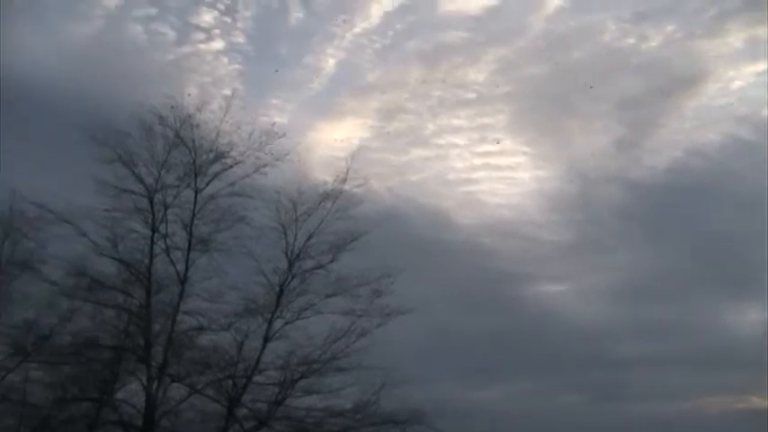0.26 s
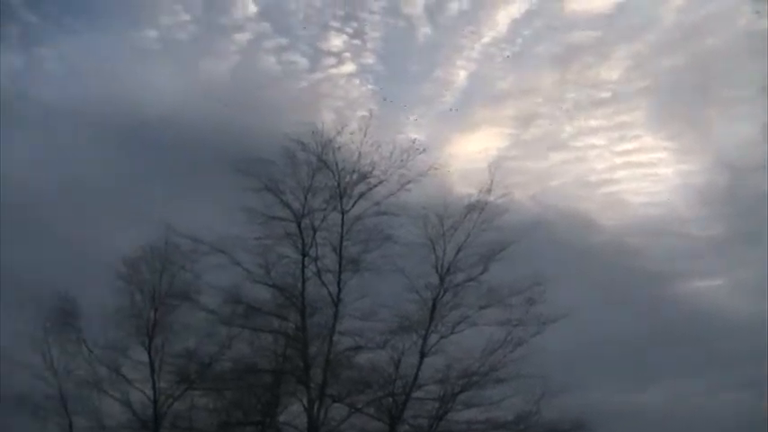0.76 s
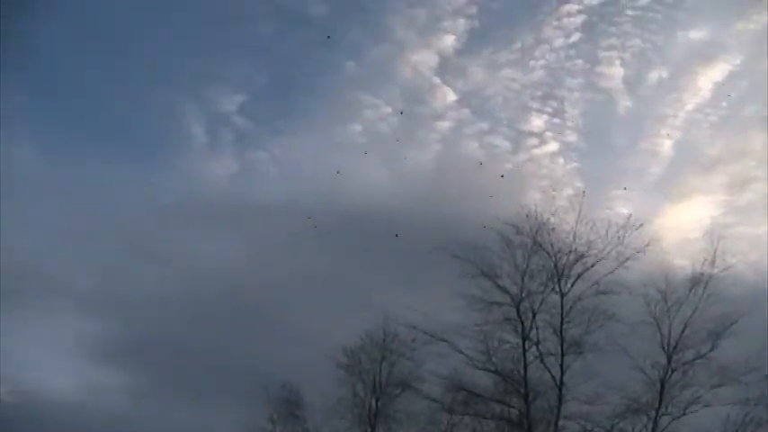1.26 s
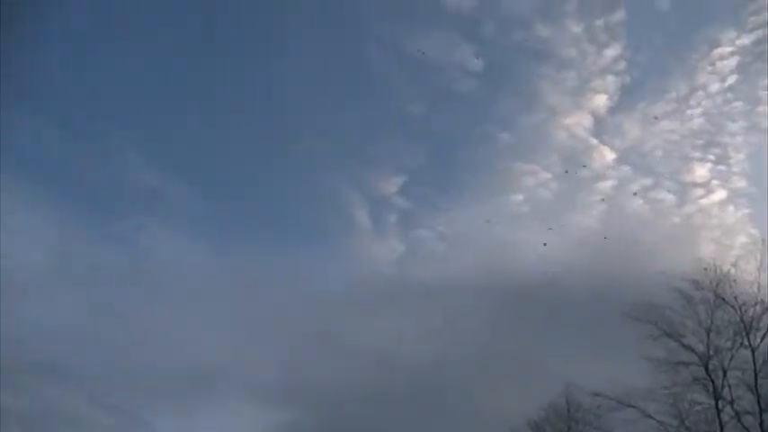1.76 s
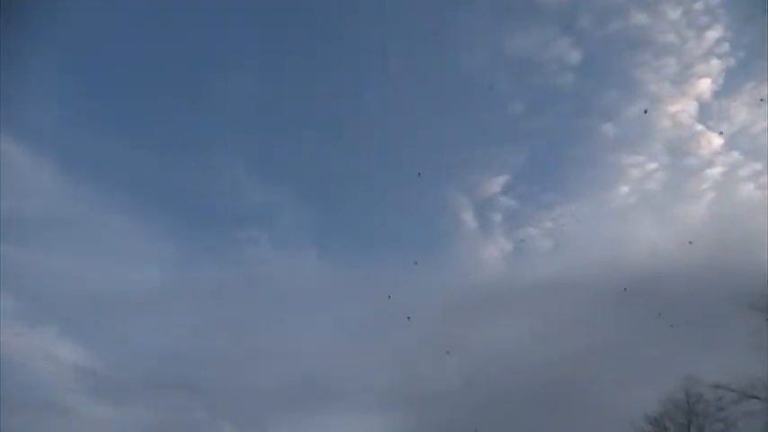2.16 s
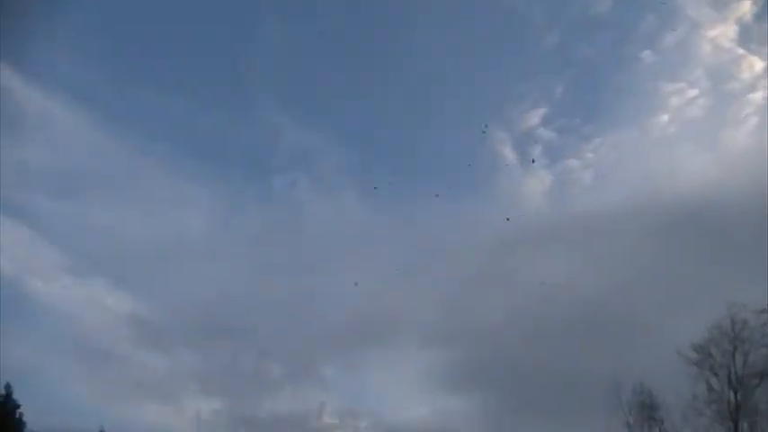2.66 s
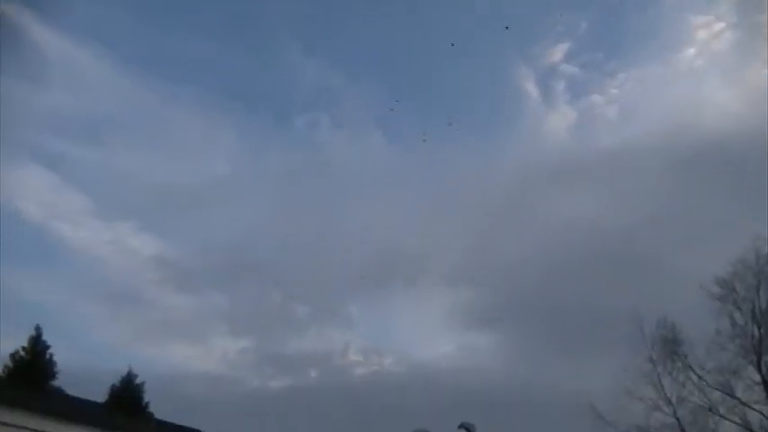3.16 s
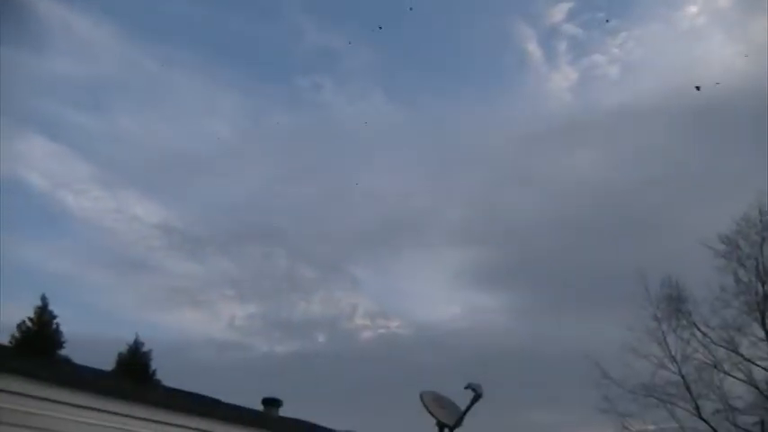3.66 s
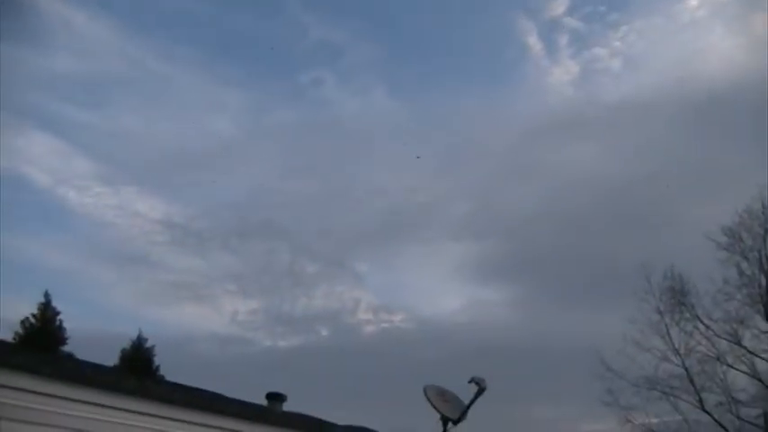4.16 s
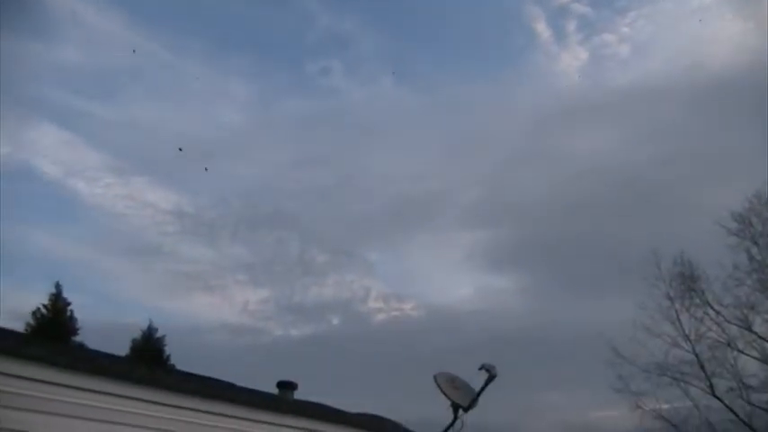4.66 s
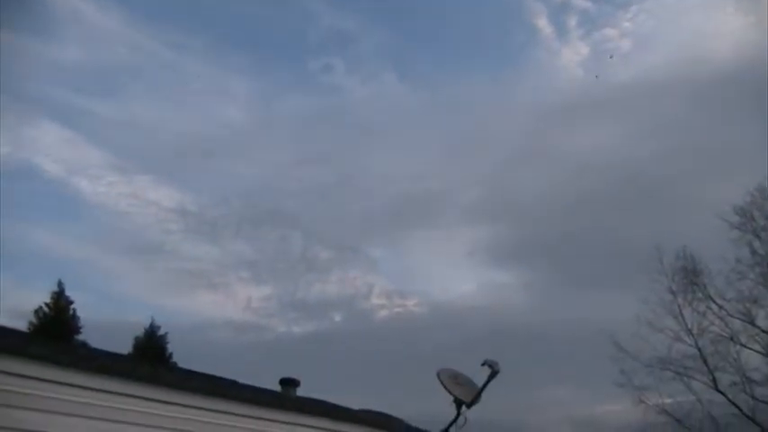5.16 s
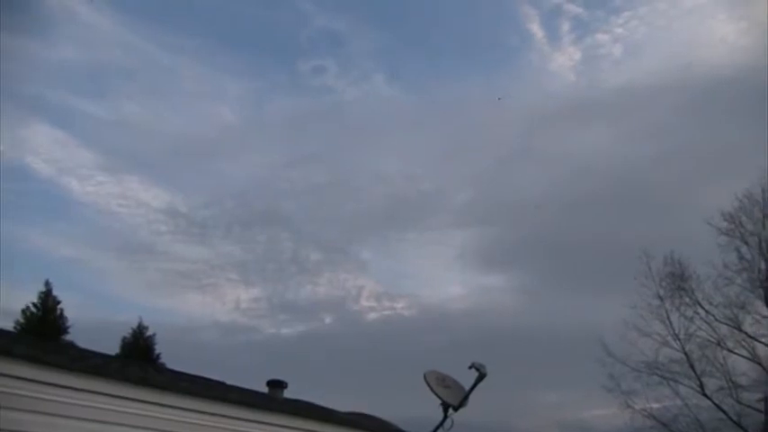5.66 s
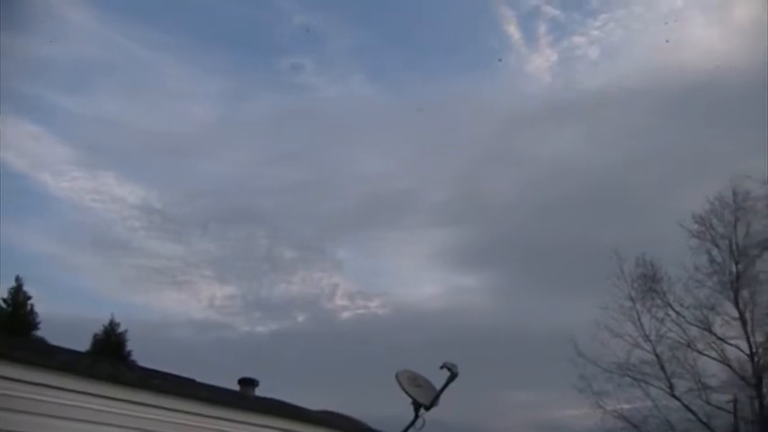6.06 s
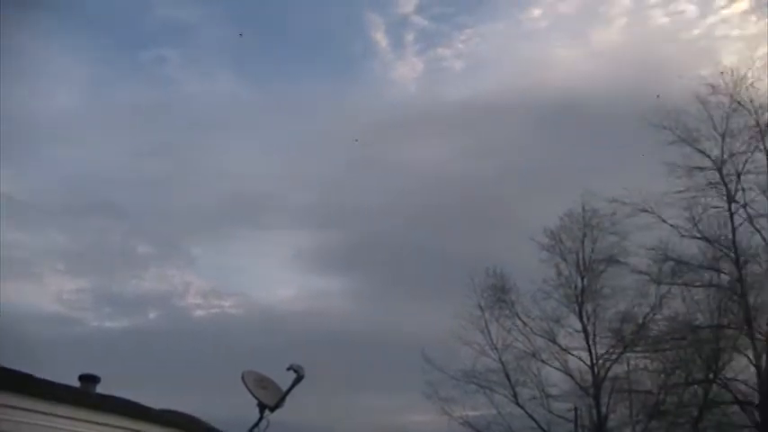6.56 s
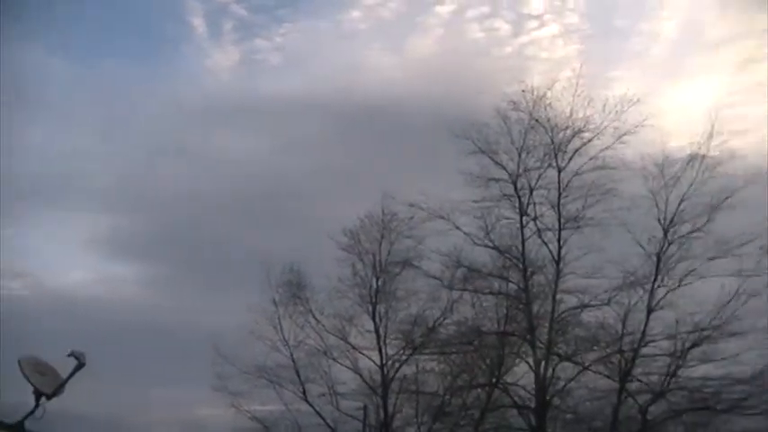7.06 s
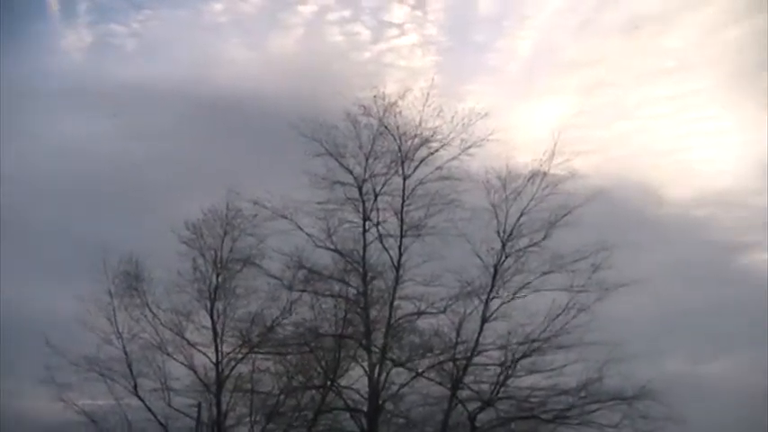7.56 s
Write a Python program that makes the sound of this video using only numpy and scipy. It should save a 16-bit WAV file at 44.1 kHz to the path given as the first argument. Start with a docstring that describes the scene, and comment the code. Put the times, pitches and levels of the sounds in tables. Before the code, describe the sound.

A steady, wide mass of high bird chatter surrounds an exposed outdoor microphone, softly echoed by trees and roofs. Clear near whistles open it, then thin out among dry rasping calls; a faint low drone passes early. Blunt wind buffets hit mid-way, leaning left. Later the close whistles crowd together again, and two distant pure hoots end it.

```python
"""A large flock of small birds passes over a garden. From the start, gliding sines whistle close by, far ones
crowd between 3 and 5 kHz over a smooth hiss of shaped noise, and low, lumpy noise is wind on the microphone ports.
Harsh chacks, noise bursts with a colour of their own, join within moments; a faint drone of narrow noise follows.
Hard buffets, short bursts of a low sine, hit the ports from 1.3 s and hardest at 3.4 and 4.5 s.
Past 7 s a far, pure low tone hoots twice."""
import sys
import numpy as np
from scipy import signal
from scipy.fft import rfft, irfft, next_fast_len
from scipy.io import wavfile
from scipy.ndimage import map_coordinates

SR = 44100
rng = np.random.default_rng(int(sys.argv[2]) if len(sys.argv) > 2 else 0)


def master_out(mix):
    """Clip the mix to full scale and print it as 16-bit PCM to the path in sys.argv[1]."""
    frames = np.transpose(np.atleast_2d(mix))
    ceiling = np.clip(frames, -1, 1)
    pcm = np.round(ceiling * 32767).astype(np.int16)
    wavfile.write(sys.argv[1], SR, pcm)


N = 343977


def from_db(db):
    """Gain of a level in dB."""
    return 10 ** (np.asarray(db) / 20)


def rms_one(x):
    """Scaled to rms 1."""
    return x / np.sqrt(np.mean(x ** 2) + 1e-20)


def in_time(rows):
    """Each column of a timed curve, sample by sample."""
    s, *columns = np.transpose(rows)
    return [np.interp(np.arange(N) / SR, s, c) for c in columns]


def at_hz(points, hz):
    """A spectrum read on a log-frequency axis."""
    points = np.array(points)
    return np.interp(np.log(hz), np.log(points[:, 0]), points[:, 1])


def sides(pan_db):
    """Left and right gain of a left-right difference; positive leans left."""
    return from_db(np.array([pan_db / 2, -pan_db / 2]))


def drift(rate_hz):
    """Slow noise of spread 1: white noise through two equal low-pass poles at rate_hz."""
    step = 40   # samples between slow values
    pole = np.exp(-2 * np.pi * rate_hz * step / SR)
    white = rng.standard_normal(N // step + 2002)
    slow = signal.lfilter([1], [1, -2 * pole, pole * pole], white)[2000:]
    return np.interp(np.arange(N) / step, np.arange(len(slow)), rms_one(slow))


def shaped(spectrum):
    """Two unrelated noises of one spectrum, as Fourier coefficients, and their frequencies."""
    size = next_fast_len(N)
    hz = np.maximum(np.arange(size // 2 + 1) * SR / size, 1)
    return rfft(rng.standard_normal((2, size))) * from_db(at_hz(spectrum, hz)), hz


# how alike the two ports hear a noise: f/Hz, likeness (1 the same, 0 unrelated, -1 opposed)
PORT_LIKENESS = [(300, -0.47), (950, 0.087), (2000, 0.64), (6000, 0.16), (15000, 0.066)]


def coloured(spectrum):
    """Stereo noise of a spectrum, the two sides as alike as the ports make them; rms 1."""
    (mid, side), hz = shaped(spectrum)
    alike = np.clip(at_hz(PORT_LIKENESS, hz), -1, 1)
    pair = np.sqrt(1 + alike) * mid + np.sqrt(1 - alike) * side * [[1], [-1]]
    return rms_one(irfft(pair, next_fast_len(N))[:, :N])


def add(out, s, sound):
    """Mixes a sound in at s seconds."""
    at = max(round(s * SR), 0)
    out[..., at:at + sound.shape[-1]] += sound[..., :max(N - at, 0)]


def notes(rows, edge_s):
    """Gain of notes that swell, hold and fade with soft edges."""
    t = np.arange(N) / SR
    gain = np.zeros(N)
    for s, length, db in rows:
        ramp = np.clip(np.minimum(t - s, s + length - t) / edge_s, 0, 1)
        gain += from_db(db) * np.sin(np.pi / 2 * ramp) ** 2
    return gain


# colour of the blurred flock, which also weights the far whistles: f/Hz, relative level/dB per Hz
WASH_SPECTRUM = [(180, -37), (300, -6.5), (621, -9), (1760, -7), (2990, -2), (3890, -3), (4910, -7.5),
                 (5880, -9), (7920, -17), (9660, -25), (12000, -27), (15600, -37)]


def wash(flock_db):
    """The farthest birds and the town blur into a smooth hiss, shaped noise of unsteady level."""
    return from_db(flock_db - 4.5 + 1.13 * drift(10.3)) * coloured(WASH_SPECTRUM)


# levels of the second and third partial of a near whistle, before pitch and strain: level/dB
OVERTONE_LEVELS = [-25, -29]
# last pitches of the calls that hook: lower and upper f/Hz
HOOK_RANGE = [4500, 5500]
GLIDE_SETTLES, HOOK_SETTLES = 1.106, 4.2   # e-folds of glide speed over one whistle; hooked calls slow sooner
CHIP_HZ = 6600   # calls that start above this flick up to their pitch first
FLICK_HZ, FLICK_S = 496, 0.00785   # the flick's depth and decay time


def whistle(length, start_hz, end_hz, wobble, flutter_db, soft, overtones_db):
    """A sine gliding ever slower to its last pitch, unsteady in pitch and breath, with patchy overtones."""
    u = np.linspace(0, 1, round(length * SR))
    knots = np.linspace(0, 1, 3 + int(length * 170))   # the breath changes every few ms
    waver, flutter, strain = [np.interp(u, knots, v) for v in rng.standard_normal((3, len(knots)))]
    settles = HOOK_SETTLES if HOOK_RANGE[0] < end_hz < HOOK_RANGE[1] else GLIDE_SETTLES
    done = np.expm1(-settles * u) / np.expm1(-settles)
    flick = FLICK_HZ * np.exp(-u * length / FLICK_S) * (start_hz > CHIP_HZ)
    hz = (start_hz + (end_hz - start_hz) * done - flick) * (1 + wobble * waver)
    phase = 2 * np.pi * (np.cumsum(hz) / SR + rng.random())
    tone = np.sin(phase)
    for partial, db in enumerate(overtones_db, start=2):
        purity_db = 60 * np.log10(min(4200 / hz.mean(), 1))   # high calls are purer
        beak_db = purity_db + 3 * rng.standard_normal()
        tone = tone + from_db(db + beak_db + 5 * strain) * np.sin(partial * phase)
    swell = np.abs(np.sin(np.pi * u)) ** soft
    return np.sqrt(2) * tone * from_db(flutter_db * flutter) * swell


def outdoors(x, scatter_db, t60):
    """Trees and roofs scatter a thin tail of echoes, other ones on each side."""
    t = np.arange(round(t60 * SR)) / SR
    sparse = rng.standard_normal((2, len(t))) * (rng.random((2, len(t))) < .01)
    echoes = sparse * from_db(-60 * t / t60) * (t > .004)
    echoes = echoes / np.sqrt(np.sum(echoes ** 2, axis=1, keepdims=True))
    return x + from_db(scatter_db) * signal.fftconvolve(x, echoes, axes=1)[:, :N]


FAR_WHISTLES = 6000
# near whistles before breath and echoes: t/s, length/s, start f/Hz, end f/Hz, level/dB, left-right/dB
NEAR_WHISTLES = [(0.0, 0.1, 3730, 3930, -44.5, -2), (0.034, 0.045, 5080, 4880, -38, 0),
                 (0.077, 0.062, 4830, 5660, -44.5, 3), (0.072, 0.12, 4910, 4250, -41, 1),
                 (0.137, 0.12, 5330, 4690, -40.5, -1), (0.22, 0.15, 4460, 4060, -41, 3),
                 (0.244, 0.12, 5240, 4670, -42, -1), (0.262, 0.048, 6750, 7000, -54, 2),
                 (0.29, 0.052, 2200, 2160, -51, 2), (0.9, 0.098, 5200, 4000, -44.5, 3),
                 (0.907, 0.058, 6970, 6640, -51, 3), (0.885, 0.13, 5290, 5000, -54, 2),
                 (1.066, 0.11, 4600, 4180, -48.5, 6), (1.186, 0.059, 4350, 4040, -47, 5),
                 (1.479, 0.045, 7100, 6430, -50.5, -2), (1.795, 0.02, 3470, 3360, -39.5, 1),
                 (2.435, 0.053, 4690, 4420, -46.5, 2), (2.403, 0.14, 1900, 1995, -55.5, 8),
                 (2.527, 0.093, 4720, 4460, -46, 3), (2.682, 0.058, 4970, 5030, -44, 2),
                 (2.92, 0.045, 4450, 4440, -53, 10), (3.319, 0.042, 3600, 3860, -42.5, 0),
                 (3.534, 0.083, 6620, 6330, -52, -1), (3.687, 0.13, 4230, 4040, -45, 3),
                 (3.903, 0.1, 4250, 3910, -45, -4), (4.026, 0.059, 6100, 5930, -52.5, 4),
                 (4.16, 0.057, 6300, 6430, -55, 0), (4.596, 0.031, 3380, 5000, -42, 0),
                 (4.697, 0.03, 3830, 5020, -41, 0), (4.984, 0.23, 4380, 3490, -47.5, -3),
                 (5.135, 0.083, 6640, 6230, -49, -3), (5.394, 0.084, 3960, 3840, -41, -7),
                 (5.54, 0.24, 4600, 4570, -42.5, -1), (5.726, 0.12, 4090, 3570, -44, -1),
                 (5.869, 0.093, 4920, 4770, -41, -4), (5.989, 0.21, 4630, 4700, -41, 2),
                 (6.038, 0.046, 6950, 6850, -52, 0), (6.078, 0.036, 5600, 6100, -47, -1),
                 (6.165, 0.055, 7050, 7100, -51, 0), (6.118, 0.13, 4600, 4440, -38.5, 2),
                 (6.467, 0.12, 4240, 3780, -47, -1), (6.458, 0.039, 7250, 6700, -50, 1),
                 (6.492, 0.073, 5300, 4880, -44, 0), (6.57, 0.041, 7400, 6300, -48, -3),
                 (6.614, 0.15, 4670, 5310, -42.5, 0), (6.739, 0.083, 5240, 4360, -40.5, 3),
                 (6.798, 0.066, 4780, 4940, -44, 0), (6.828, 0.041, 5950, 5800, -50, 0),
                 (6.855, 0.055, 4700, 4180, -51, 0), (6.918, 0.05, 5250, 5460, -51, 2),
                 (6.958, 0.047, 5440, 5340, -46, 2), (6.993, 0.046, 5330, 4950, -47, 2),
                 (7.002, 0.13, 5840, 4495, -40, -2), (7.066, 0.027, 7200, 7250, -50, 4),
                 (7.13, 0.073, 6900, 6260, -48, 0), (7.184, 0.02, 4600, 5080, -43, 0),
                 (7.185, 0.063, 5470, 5400, -48, 0), (7.206, 0.04, 7050, 6900, -51, 0),
                 (7.205, 0.083, 4210, 3780, -39.5, -2), (7.279, 0.045, 4850, 5400, -46, -6),
                 (7.32, 0.16, 5370, 5110, -44.5, -4), (7.395, 0.059, 6780, 6340, -41, -2),
                 (7.486, 0.11, 4650, 4500, -43, 6), (7.575, 0.135, 4570, 3800, -38, -3),
                 (7.62, 0.12, 5880, 4980, -42.5, -2), (7.691, 0.125, 3770, 3540, -39, -4),
                 (7.74, 0.062, 5400, 4760, -39.5, 1)]


def whistles(flock_db):
    """Gliding sines: near ones as listed; far ones at random, hoarse, without overtones, longer when higher."""
    near, far = np.zeros((2, N)), np.zeros((2, N))
    for s, length, start_hz, end_hz, db, pan_db in NEAR_WHISTLES:
        top_db = np.add(OVERTONE_LEVELS, min(db + 40, 0))   # fainter calls are farther and lose their top
        call = whistle(length, start_hz, end_hz, wobble=.007, flutter_db=3.6, soft=.25, overtones_db=top_db)
        add(near, s, from_db(db) * sides(pan_db)[:, None] * call)

    when = rng.random(FAR_WHISTLES) * N / SR
    traits = rng.standard_normal((FAR_WHISTLES, 5))
    for s, (long, pitch, fall, loud, pan) in zip(when, traits):
        hz = 5300 * np.exp(-.27 * abs(pitch + 1.0))
        glide = hz * (0.025 + 0.04 * fall)
        length = .019 * np.exp(.5 * long) * (hz / 4200) ** 2
        call = whistle(length, hz + glide, hz - glide, wobble=.012, flutter_db=3, soft=.6, overtones_db=[])
        low_db = 3.8 * min(np.log2(hz / 3000), 0)   # calls below 3 kHz are fainter
        db = at_hz(WASH_SPECTRUM, hz) + low_db + 2.3 * min(loud, 1.3)
        add(far, s, from_db(db) * sides(8.1 * pan)[:, None] * call)
    return outdoors(near + from_db(flock_db - 2.4) * rms_one(far), scatter_db=-8.0, t60=.3)


OPPOSED_DB = 9.5   # wind pushes one port as it pulls the other: this far above the part both share
WIND_LEAN_DB, WIND_LEAN_FOLLOWS = -0.1, 0.33   # left-right at mean level; share of the level swing leaning left
BUFFET_LEAN_DB, BUFFET_CYCLES = 5.5, 0.47   # buffets hit the left port harder; half-width of a push in cycles
# wind strength, of the part both ports share, before the lumps: t/s, level/dB
WIND_STRENGTH = [(0, -54), (.4, -50.5), (.75, -53.5), (1.28, -48.5), (1.5, -58), (2.05, -45), (2.4, -55.5),
                 (2.95, -46.5), (3.14, -51.5), (3.25, -38.5), (3.5, -36), (3.72, -45), (4.05, -53),
                 (4.3, -53.5), (4.55, -56.5), (5.05, -53), (5.5, -44.5), (5.75, -53.5), (6.7, -50.5),
                 (7.2, -61.5), (7.45, -52.5), (7.8, -58)]
# colour of the wind: f/Hz, relative level/dB per Hz
GUST_SPECTRUM = [(20, -9.5), (55, 3), (118, -1.5), (200, -10), (310, -15.5), (450, -34), (800, -61)]
# single buffets before their lean: t/s, level/dB, f/Hz
HARD_BUFFETS = [(1.339, -25.5, 117), (1.91, -27, 125), (2.104, -24.5, 125), (2.921, -26, 119),
                (3.185, -21.5, 133), (3.269, -15.5, 148), (3.408, -8, 122), (3.543, -14.5, 123),
                (3.629, -20, 110), (3.809, -19.5, 105), (4.264, -26, 125), (4.48, -9, 140),
                (4.494, -17, 125), (5.299, -20, 128), (7.032, -24.5, 137)]


def wind():
    """Lumpy low noise, mostly opposed in the two ports, with single hard buffets of a cycle or two."""
    level_db, = in_time(WIND_STRENGTH)
    pan_db = WIND_LEAN_DB + WIND_LEAN_FOLLOWS * (level_db - level_db.mean())
    both, opposed = rms_one(irfft(shaped(GUST_SPECTRUM)[0], next_fast_len(N))[:, :N])
    lumps = from_db(level_db + 4.6 * drift(11.6))
    out = lumps * sides(pan_db) * (both + from_db(OPPOSED_DB) * opposed * [[1], [-1]])
    t = np.arange(round(.06 * SR)) / SR
    for s, db, hz in HARD_BUFFETS:
        swell = np.exp(-((t - .018) * hz / BUFFET_CYCLES) ** 2)
        push = np.sin(2 * np.pi * (hz * t + rng.random())) * swell
        add(out, s, from_db(db) * sides(BUFFET_LEAN_DB)[:, None] * push * [[1], [-1]])
    return out


def chack_shape(length):
    """A burst that swells in a few ms, holds and dies away among the trees."""
    t = np.arange(round((length + .06) * SR)) / SR
    swell = np.sin(np.pi / 2 * np.minimum(t / .018, 1)) ** 2
    return swell * np.exp(-np.maximum(t - length, 0) / .011)


FAR_CHACKS = 420
# near chacks: t/s, length/s up to the fade, level/dB before the throat's colour
NEAR_CHACKS = [(0.153, 0.015, -38.5), (0.754, 0.041, -40), (0.848, 0.016, -39), (0.906, 0.03, -46),
               (0.956, 0.039, -43), (1.425, 0.018, -44), (1.681, 0.04, -42), (1.719, 0.043, -41.5),
               (1.855, 0.014, -42), (1.971, 0.017, -40.5), (2.127, 0.039, -38.5), (2.437, 0.026, -47),
               (2.598, 0.027, -43), (2.881, 0.013, -43), (3.321, 0.029, -42), (3.766, 0.037, -47),
               (3.879, 0.016, -42), (3.999, 0.026, -40), (4.359, 0.012, -38), (4.487, 0.028, -42),
               (4.605, 0.029, -37.5), (4.711, 0.055, -38.5), (5.568, 0.037, -44), (5.701, 0.019, -34),
               (5.765, 0.016, -39), (6.12, 0.046, -40), (6.355, 0.022, -40), (6.54, 0.057, -40.5),
               (6.707, 0.019, -37.5), (6.891, 0.025, -41.5), (7.146, 0.052, -40), (7.19, 0.018, -40),
               (7.267, 0.027, -42.5), (7.369, 0.065, -43.5), (7.557, 0.064, -40), (7.725, 0.045, -38.5),
               (7.775, 0.016, -36)]
# colour of a chack before the throat: f/Hz, relative level/dB per Hz
CHACK_SPECTRUM = [(700, -14.5), (1500, -10.5), (3000, 0), (4500, 5), (6000, -6), (8500, -10), (10000, -18),
                  (12000, -16), (15500, -38)]
# edges between the bands that each throat colours: f/Hz
THROAT_SPLITS = [2600, 3600, 4800, 6500, 9500]


def chacks():
    """Harsh noise from a wide-open beak; each throat colours its call, so every band gets its own strength."""
    when, long, loud = rng.random((FAR_CHACKS, 3)).T
    far = np.transpose([when * N / SR, 0.0043 + 0.036 * long, -54 + 9.95 * loud])
    power = np.zeros((len(THROAT_SPLITS) + 1, N))
    # distance dulls the far ones
    air_db = np.log2(np.array([*THROAT_SPLITS, 12000])[:, None] / 4000) * -4.5
    for calls, throat_db, dull_db in (NEAR_CHACKS, 2.2, 0), (far, 4.2, air_db):
        for s, length, db in calls:
            band_db = db + dull_db + throat_db * rng.standard_normal((len(power), 1))
            add(power, s, (from_db(band_db) * chack_shape(length)) ** 2)

    noise = coloured(CHACK_SPECTRUM)
    below = [0]   # the noise below each band edge; neighbours differ by one band
    for hz in THROAT_SPLITS:
        low_pass = signal.butter(4, hz, fs=SR, output="sos")
        below.append(signal.sosfiltfilt(low_pass, noise))
    below.append(noise)
    return sum(np.sqrt(p) * (high - low) for p, low, high in zip(power, below, below[1:]))


# the faint far drone: t/s, length/s, level/dB
DRONE_NOTES = [(.8, 1.7, -63)]


def drone():
    """Noise in a narrow low band, swelling and fading slowly."""
    band = signal.butter(2, [290, 350], "band", fs=SR, output="sos")
    hum = rms_one(signal.sosfilt(band, rng.standard_normal(N)))
    return notes(DRONE_NOTES, edge_s=0.32) * hum


# the hoot, two notes: t/s, length/s, level/dB
HOOT_NOTES = [(7.05, 0.233, -57), (7.3, .17, -62.5)]
HOOT_HZ = 575


def hoot():
    """A pure low tone from far off, a sine with soft edges."""
    tone = np.sin(2 * np.pi * HOOT_HZ * np.arange(N) / SR)
    return np.sqrt(2) * notes(HOOT_NOTES, edge_s=0.025) * tone


# the microphone turns away from the flock: t/s, delay of the left port/s
MICROPHONE_TURN = [(0, 0), (4, 3e-5), (7.8, 4e-5)]


def turned(x):
    """As the microphone turns, the left port hears the flock a little later."""
    delay, = in_time(MICROPHONE_TURN)
    late = map_coordinates(x[0], [np.arange(N) - SR * delay], order=5, mode="nearest")
    return np.array([late, x[1]])


# strength of the far flock, before each layer's own trim: t/s, level/dB
FLOCK_STRENGTH = [(0, -40), (.9, -39.5), (1.26, -40), (2.3, -40.5), (3.3, -39.5), (3.93, -39),
                  (4.32, -40.5), (4.65, -38.5), (4.95, -40), (5.56, -38.5), (7.8, -39.5)]


def scene():
    """Birds, wind, drone and hoot together."""
    flock_db, = in_time(FLOCK_STRENGTH)
    birds = wash(flock_db) + whistles(flock_db) + chacks()
    return turned(birds) + wind() + drone() + hoot()


def record(dry):
    """The top is cut steeply by an elliptic low-pass."""
    low_pass = signal.ellip(16, .3, 70, 15830, fs=SR, output="sos")   # ripple dB, stop dB, cutoff Hz
    return signal.sosfilt(low_pass, dry)


dry = scene()
out = record(dry)
master_out(out)
```